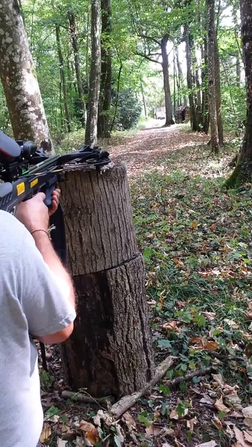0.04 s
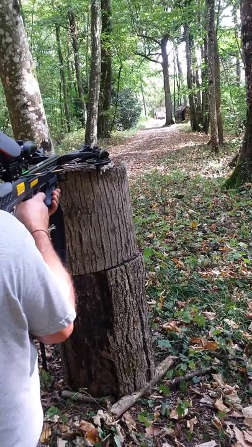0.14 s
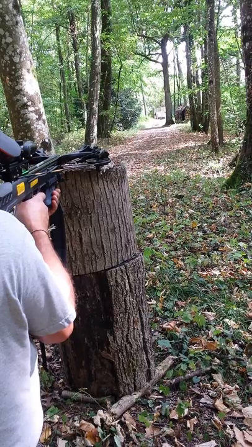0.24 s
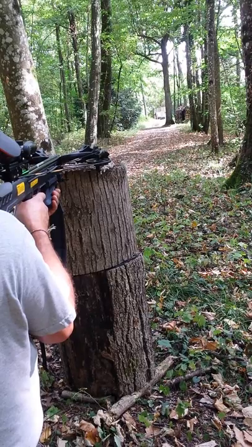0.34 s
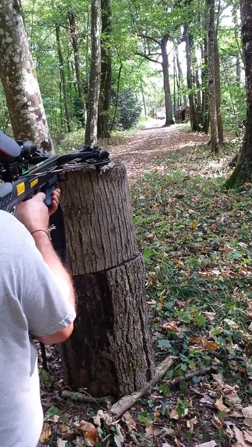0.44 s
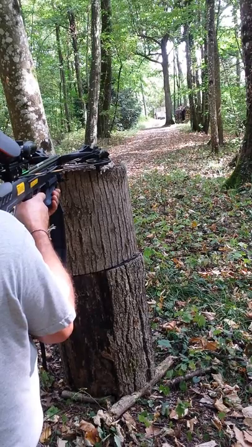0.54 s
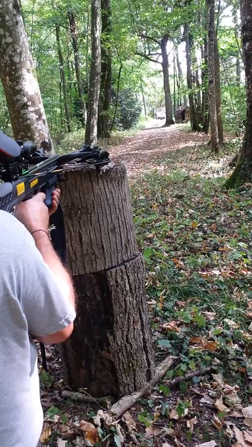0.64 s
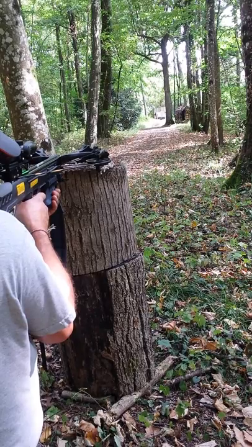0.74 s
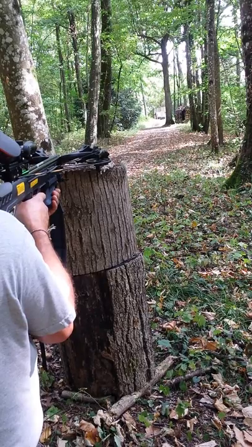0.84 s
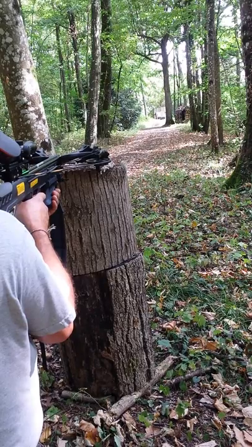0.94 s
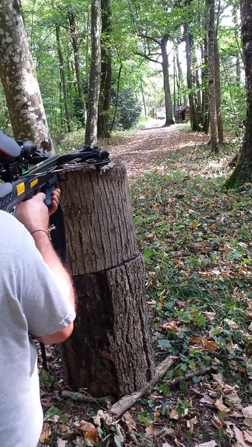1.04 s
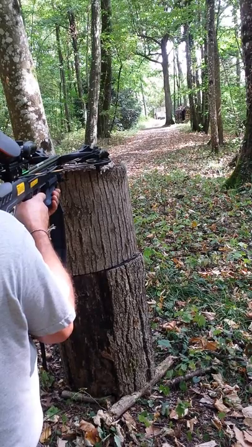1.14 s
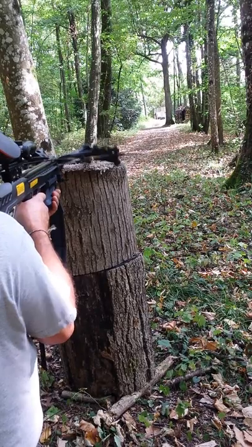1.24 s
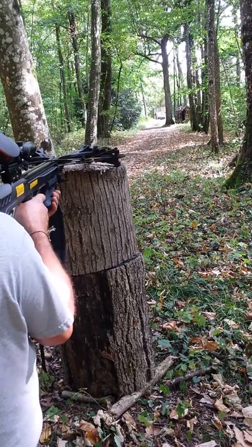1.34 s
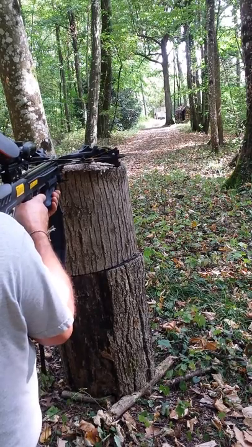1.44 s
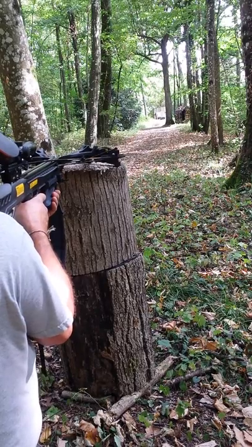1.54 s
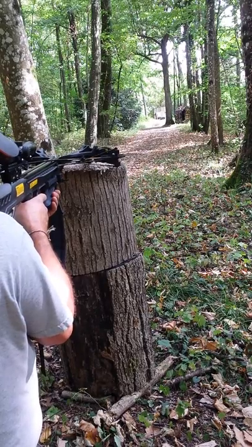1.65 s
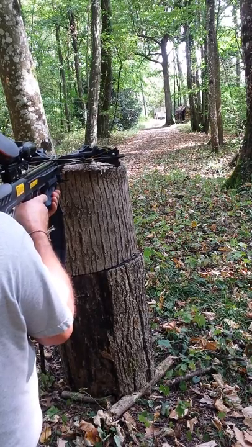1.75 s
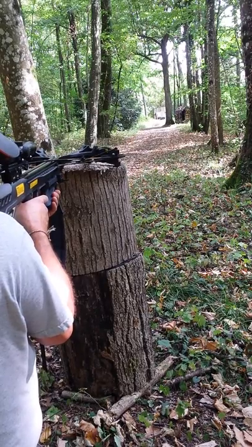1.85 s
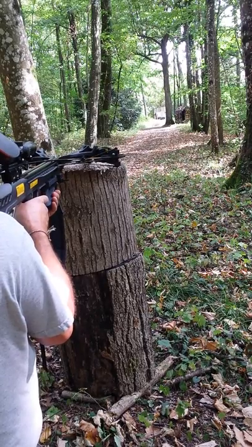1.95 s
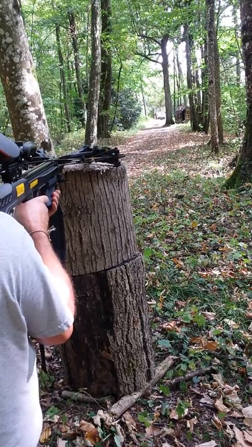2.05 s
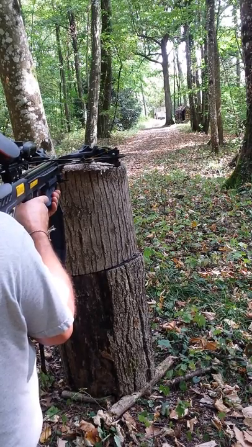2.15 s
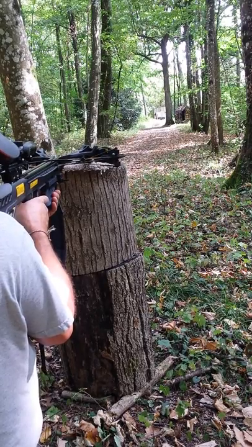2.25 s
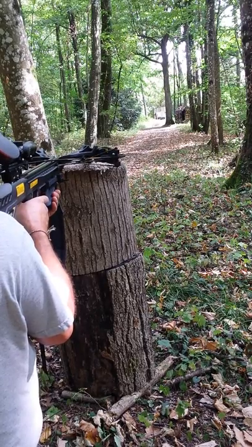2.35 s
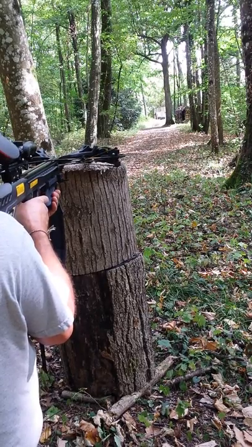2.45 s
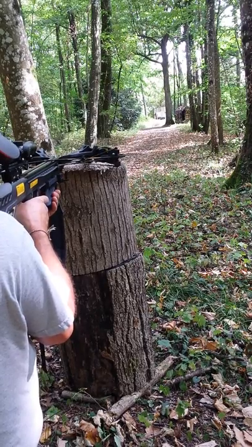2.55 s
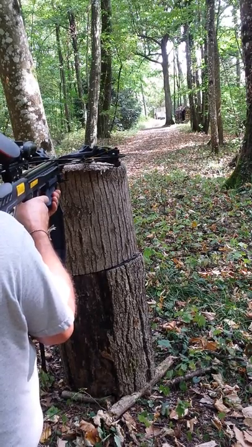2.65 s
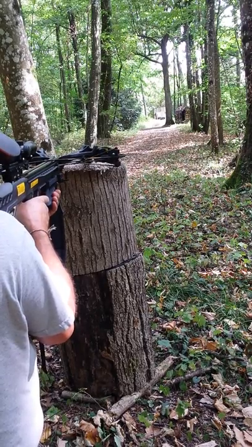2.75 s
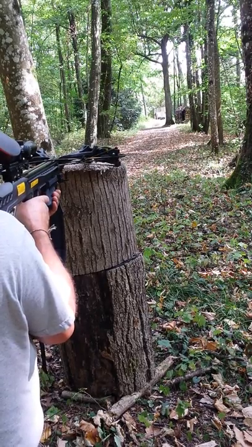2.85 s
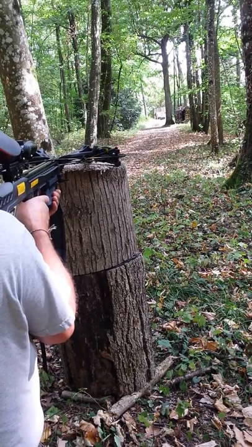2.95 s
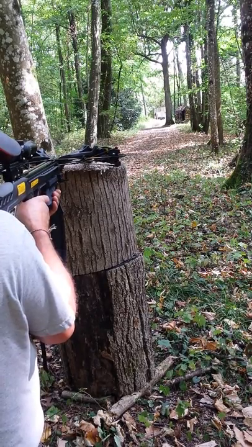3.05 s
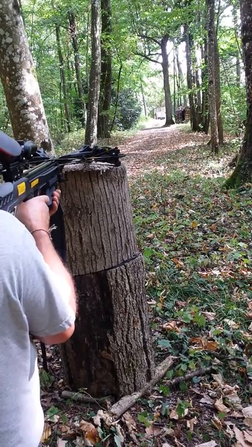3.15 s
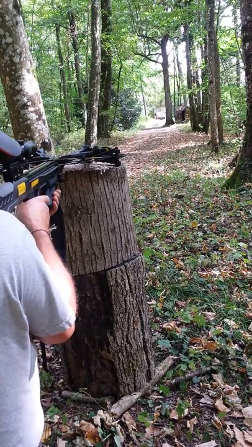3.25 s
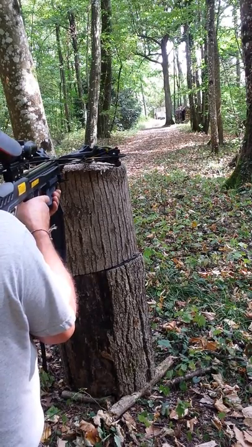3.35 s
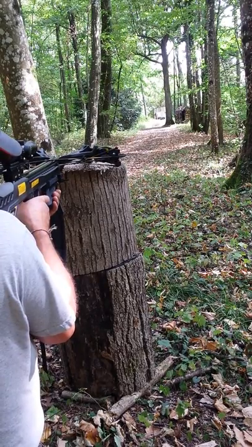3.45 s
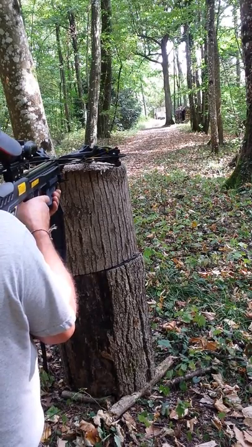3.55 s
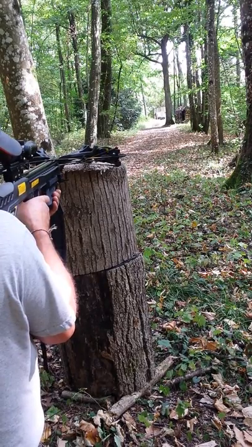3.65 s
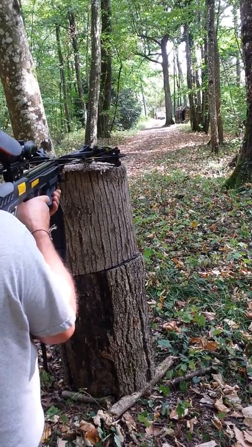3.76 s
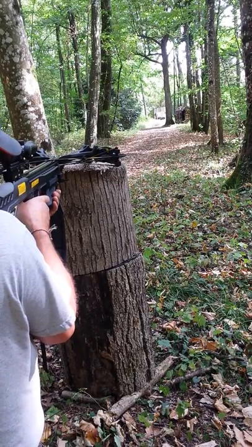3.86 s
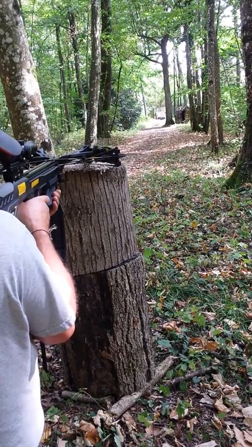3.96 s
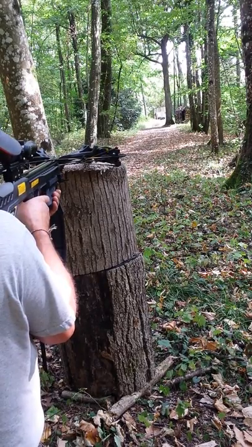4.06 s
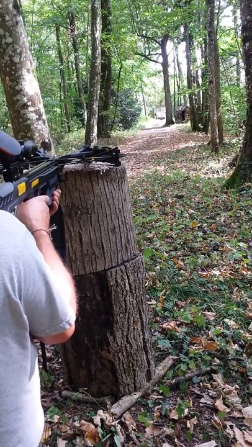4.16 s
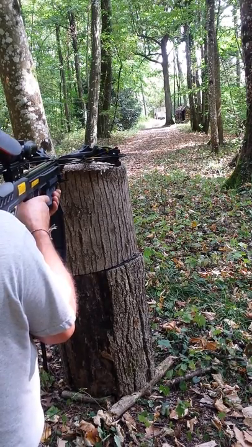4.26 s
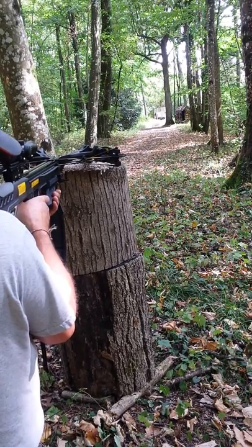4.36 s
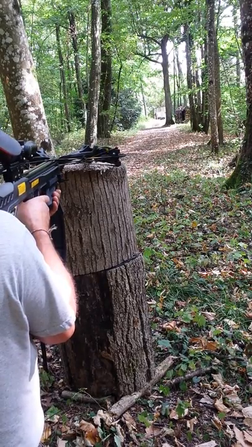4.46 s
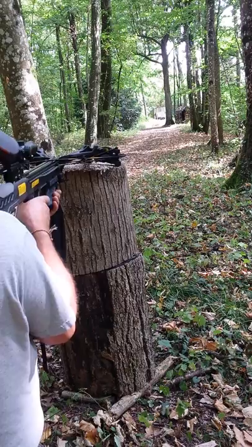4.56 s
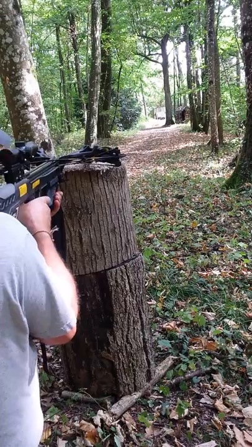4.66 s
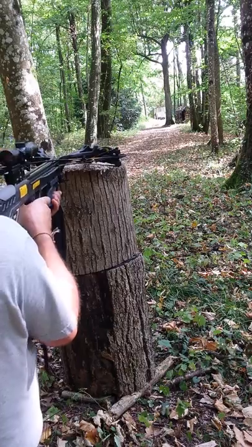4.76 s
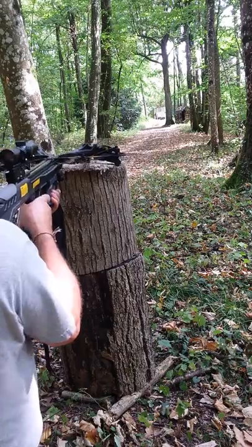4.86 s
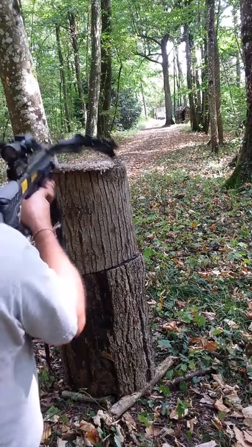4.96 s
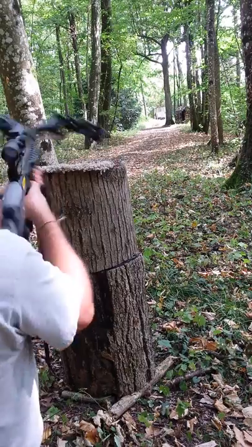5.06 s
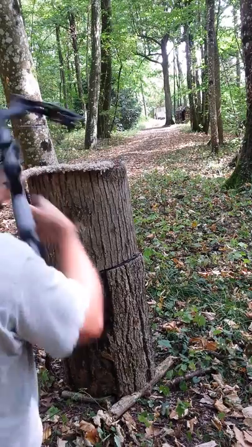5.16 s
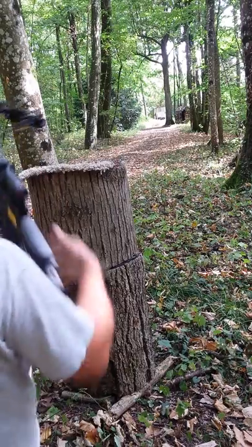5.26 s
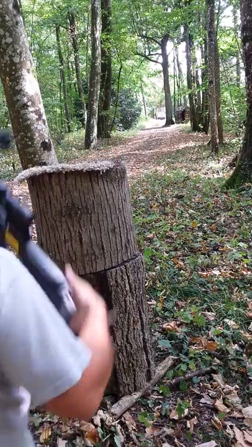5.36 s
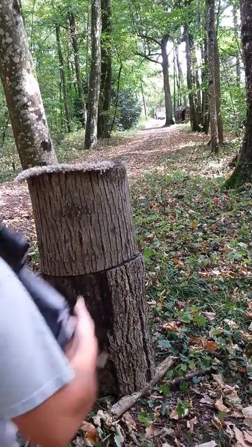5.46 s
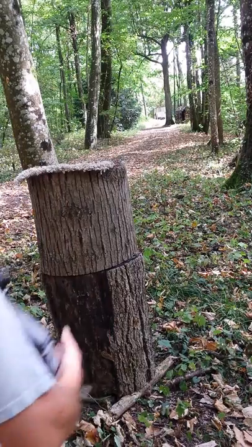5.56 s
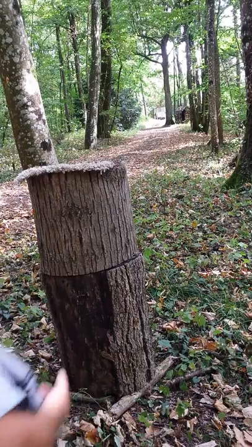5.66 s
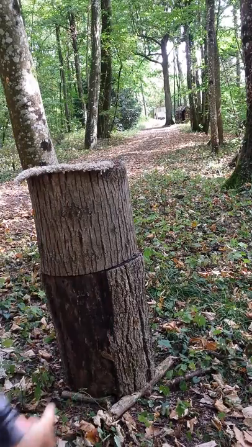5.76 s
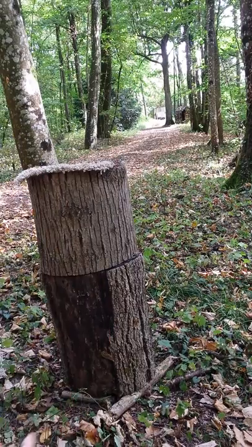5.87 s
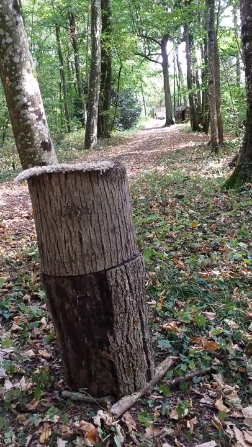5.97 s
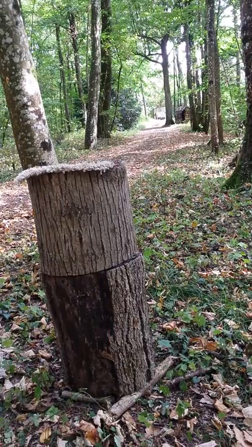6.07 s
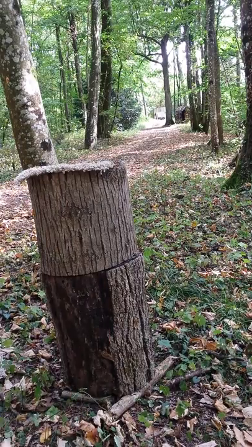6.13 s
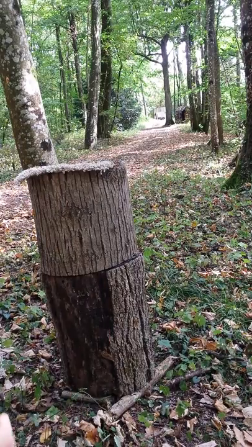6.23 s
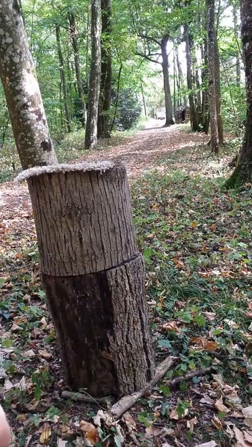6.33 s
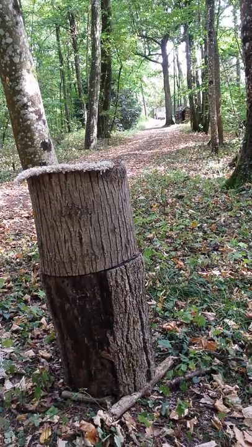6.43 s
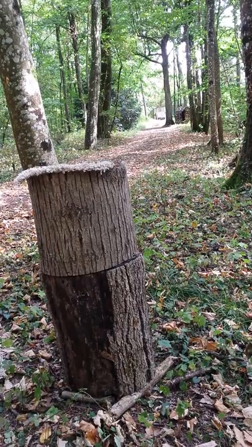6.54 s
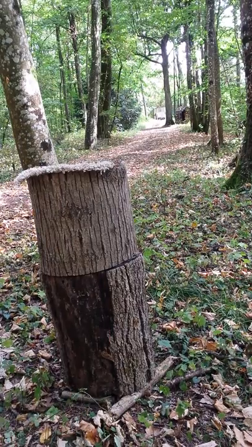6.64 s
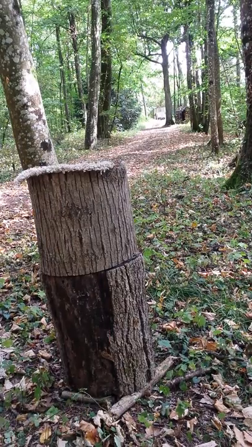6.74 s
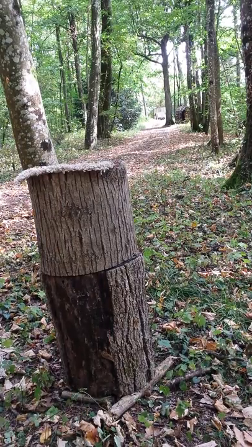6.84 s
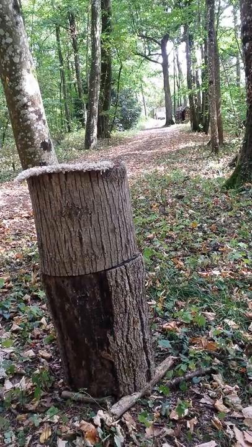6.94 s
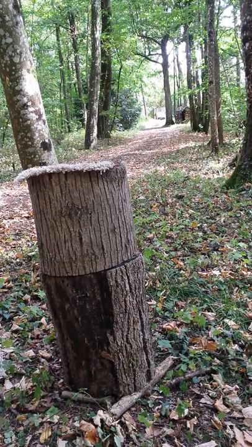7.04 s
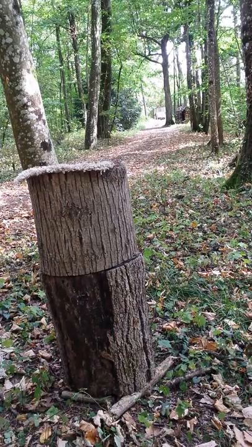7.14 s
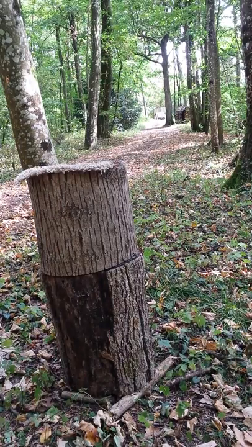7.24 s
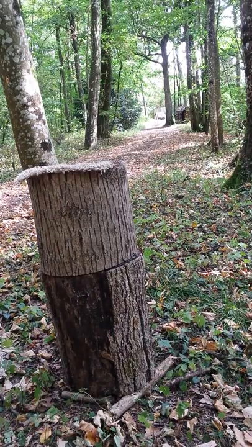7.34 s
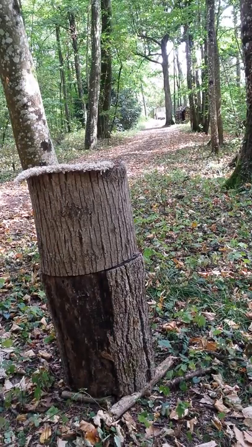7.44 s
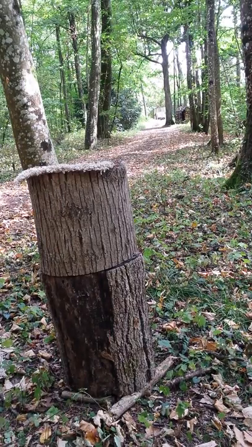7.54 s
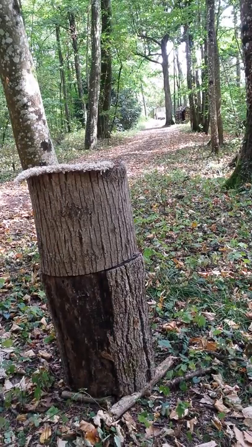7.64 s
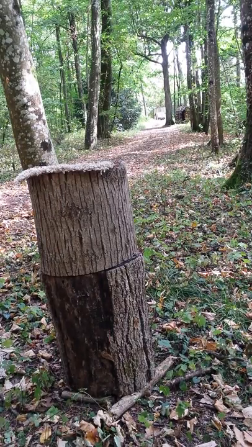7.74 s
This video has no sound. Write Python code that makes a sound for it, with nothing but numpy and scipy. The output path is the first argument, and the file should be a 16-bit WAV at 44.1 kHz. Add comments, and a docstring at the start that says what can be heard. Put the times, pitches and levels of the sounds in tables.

```python
"""Crossbow shot in a quiet wood

A crossbow is fired from a tree stump: contacts are noise bursts, its parts are ringing modes, trunks are echoes.
The bolt knocks into a far target, with a dull wash of echoes; a leaf or something dropping ticks in the litter.
Small birds call in gliding and held sine notes. The shooter lifts the bow away and steps through dry leaves:
bumps, brushed sleeves, leaf crackle, stalks snapping underfoot.
Two small microphone ports colour it all, and a loud peak ducks the recorder's gain for about a second."""
import sys
import numpy as np
from scipy import signal
from scipy.fft import rfft, irfft, next_fast_len
from scipy.io import wavfile
from scipy.ndimage import uniform_filter1d, minimum_filter1d

SR = 44100
rng = np.random.default_rng(int(sys.argv[2]) if len(sys.argv) > 2 else 0)


def unload_audio(sound):
    """Save the sound as a 16-bit wav file, at the path given as the first command line argument."""
    columns = np.transpose(np.atleast_2d(sound))
    # keep every value between -1 and 1, then stretch to whole-number steps
    steps = np.round(np.clip(columns, -1, 1) * 32767)
    wavfile.write(sys.argv[1], SR, steps.astype(np.int16))


N = 343980
SIZE = next_fast_len(N + SR)  # padded length for filtering
T = np.arange(N) / SR
HZ = np.maximum(np.arange(SIZE // 2 + 1) * SR / SIZE, 1)
PORT_SPACING_M, SOUND_SPEED_M_S = 0.094, 343

# In every table, levels are relative and stand before any colouring, mixing gain or placing.
# decay of the wood's echoes: hz, t60_s
WOOD_T60 = [(100, 0.83), (700, 0.73), (1500, 1), (3500, 0.61), (7000, 0.66), (14000, 0.3775)]
# a foot presses or drags in the leaf litter: peak_s, crackle_db, scuff_db, swell_s, t60_s, crunch_hz
STEPS = [(5.91, -59, -59.5, 0.0703, 3.8, 5884), (6.19, -71, -61.5, 0.027, 1.3, 5840),
         (6.741, -51, -55, 0.027, 0.18, 5314), (6.795, -50.5, -56.5, 0.025, 0.363, 5473),
         (6.921, -45.5, -53.5, 0.0297, 0.71, 12370), (7.152, -46.5, -51.5, 0.087, 2.1, 6172),
         (7.194, -39.5, -52.5, 0.018, 0.42, 9400), (7.295, -45, -45.5, 0.02003, 0.14, 5477),
         (7.47, -53, -53.5, 0.1531, 1.5, 9500), (7.665, -51, -54, 0.0193, 0.67, 5550),
         (7.712, -38.5, -51.5, 0.00648, 0.862, 5110), (7.78, -38, -51, 0.027, .6, 5380)]
# colour of soles and clothes scuffing: hz, level_db
SCUFF_COLOUR = [(40, 0.5), (120, 1.5), (400, 0), (900, -2), (1600, -8.5), (3000, -11.5), (8000, -25)]


def from_db(db):
    """Decibels to gain."""
    return 10 ** (np.asarray(db) / 20)


def at_hz(points, hz):
    """Read a table on a log-frequency axis."""
    f, value = np.transpose(points)
    return np.interp(np.log(hz), np.log(f), value)


def decay(age, t60):
    """Exponential fall of 60 dB in t60 seconds."""
    return np.exp(-np.log(1000) * age / t60)


def filtered(x, response):
    """Apply a frequency response."""
    return irfft(rfft(x, SIZE) * response, SIZE)[..., :N]


def coloured(x, points):
    """Minimum-phase colouring, so nothing sounds before its cause."""
    cepstrum = irfft(np.log(from_db(at_hz(points, HZ))), SIZE)
    # fold the cepstrum onto positive times
    cepstrum[1:SIZE // 2] *= 2
    cepstrum[SIZE // 2 + 1:] = 0
    return filtered(x, np.exp(rfft(cepstrum)))


def resonant(x, hz, q):
    """Keep what lies around one pitch."""
    b, a = signal.iirpeak(hz, max(q, 1), fs=SR)
    return signal.lfilter(b, a, x + 1e-18)


def drift(rate_hz):
    """Random wander with a spread of one, smoothed above rate_hz."""
    slow = filtered(rng.standard_normal(SIZE), 1 / (1 + (HZ / rate_hz) ** 2))
    return slow / slow.std()


def diffuse():
    """White noise from all sides: the ports agree only on long waves."""
    a, b = rng.standard_normal((2, N))
    alike = np.clip(.95 * np.sinc(2 * HZ * PORT_SPACING_M / SOUND_SPEED_M_S), -1, 1)
    right = filtered(a, alike) + filtered(b, np.sqrt(1 - alike ** 2))
    return np.array([a, right])


def placed(x, lag_ms, lean_db):
    """The left port hears later by lag_ms; short waves lean left by lean_db, long waves reach both alike."""
    shade_db = lean_db / 2 * HZ ** 2 / (HZ ** 2 + 1500 ** 2)
    late = np.exp(-2j * np.pi * HZ * lag_ms / 1000)
    return filtered(x, np.array([from_db(shade_db) * late, from_db(-shade_db)]))


def bursts(rows):
    """Envelope of sudden contacts that die away; their powers add."""
    power = np.zeros(N)
    for s, level_db, t60 in rows:
        at = round(s * SR)
        age = T[:min(N - at, SR // 4)]
        power[at:at + len(age)] += (from_db(level_db) * decay(age, t60)) ** 2
    return np.sqrt(power)


def struck(blows, modes):
    """Each blow sets the body's modes ringing."""
    clicks, age = np.zeros(N), T[:SR // 2]
    for s, level_db in blows:
        clicks[round(s * SR)] += from_db(level_db)
    ring = sum(from_db(db) * np.sin(2 * np.pi * hz * age) * decay(age, t60) for hz, db, t60 in modes)
    return signal.fftconvolve(clicks, ring)[:N]


def click(rows):
    """One unit pulse at the moment of the loudest of these contacts."""
    loudest = max(rows, key=lambda row: row[1])
    return signal.unit_impulse(N, round(loudest[0] * SR))


def breaks(per_s, spread_db):
    """Clicks at random moments: many small, a few large."""
    born = np.flatnonzero(rng.random(N) < per_s / SR)
    size_db = spread_db * np.minimum(rng.exponential(1, len(born)), 3.5)
    clicks = np.zeros(N)
    clicks[born] = from_db(size_db) * rng.choice([-1, 1], len(born))
    return clicks / clicks.std()


def pressure(peak_s, swell_s, t60):
    """Pressure swells to a peak of one, then eases off."""
    age = T - peak_s
    fall = np.where(age < 0, (age / swell_s) ** 2 / 2, np.log(1000) * age / t60)
    return np.exp(-np.minimum(fall, 20))


def wood(x, t60s, build_s, trunk_width_s=0.018):
    """Echoes from countless trunks, as decaying noise, build up and then die, band by band."""
    # groups of trunks that answer more strongly, or less: delay_s, gain_db
    trunks = [(.043, 2), (0.093, 4), (.138, 1.5), (.19, -0.5), (.264, -1.5)]
    age, centres = T[:3 * SR // 2], np.geomspace(100, 14000, 8)
    echoes = rfft(diffuse()[:, :len(age)])
    hz = np.maximum(np.linspace(0, SR / 2, echoes.shape[1]), 1)
    response = 0
    for centre, share in zip(centres, np.eye(len(centres))):
        band = irfft(echoes * np.interp(np.log(hz), np.log(centres), share), len(age))
        response = response + band * decay(age, at_hz(t60s, centre))
    answers_db = sum(db * np.exp(-((age - s) / trunk_width_s) ** 2) for s, db in trunks)
    response = response * (1 - np.exp(-age / build_s)) * from_db(answers_db)
    response /= np.sqrt(np.sum(response ** 2) / 2)  # unit energy per port, on average
    return signal.fftconvolve(x[None], response, axes=1)[:, :N]


def air():
    """Far wind in the crowns: coloured noise from all sides, its level barely moving."""
    # the wood's distant murmur: hz, level_db
    murmur_colour = [(15, -57), (35, -43.5), (85, -41.5), (160, -43.5), (260, -46.5), (450, -49.5),
                     (1000, -52), (2000, -58), (3400, -60.5), (5000, -65), (7200, -68), (15000, -79)]
    # lean to the left, added there and taken from the right: hz, lean_db
    lean = [(200, 0.6019), (1000, 0.647), (2200, 2.5), (5000, 0.8353), (9000, -1)]
    murmur = coloured(diffuse(), murmur_colour) * from_db(.5 * drift(4.4))
    lean_db = at_hz(lean, HZ)
    return placed(filtered(murmur, from_db([lean_db, -lean_db])), lag_ms=0.04746, lean_db=-0.5)


def whistles(calls, length_s, glide_hz, waver):
    """One gliding sine note, sung at each call."""
    out, n = np.zeros(N), round(length_s * SR)
    for s, level_db, hz in calls:
        at = max(round(s * SR), 0)
        pitch = np.linspace(hz, hz + glide_hz, n) * waver[at:at + n]
        tone = np.sin(2 * np.pi * np.cumsum(pitch) / SR)
        out[at:at + n] += from_db(level_db) * np.sqrt(np.hanning(n)) * tone
    return out


def birds():
    """Thin wavering whistles high in the canopy and one low far coo, blurred by their echoes."""
    # one bird repeats a high, falling "tsee": start_s, level_db, start_pitch_hz
    tsees = [(.11, -61, 7830), (.27, -61.5, 8230), (.413, -63, 7850), (.628, -61.5, 8130),
             (1.765, -60, 7933), (1.93, -61, 7900), (3.761, -60, 7978), (4.23, -65, 7980),
             (4.377, -60, 8080), (4.915, -57.5, 7554)]
    # another calls a rising "hweet": start_s, level_db, start_pitch_hz
    hweets = [(4.958, -58, 3590), (5.34, -62, 3484)]
    # quick downward flicks: start_s, level_db, start_pitch_hz
    flicks = [(1.035, -57, 5230), (5.308, -60.5, 7400)]
    # whistles without a glide and a low far coo: start_s, level_db, length_s, pitch_hz
    held_notes = [(.018, -73, 0.175, 5270), (.13, -60, 0.2, 486), (.37, -68, 0.26, 5430),
                  (4.843, -62, 0.0553, 7400)]
    waver = 1 + .012 * drift(127.05)  # as a share of the pitch
    steady = 1 + .005 * drift(120)  # the held notes waver less
    song = (whistles(tsees, length_s=.056, glide_hz=-640, waver=waver)
            + whistles(hweets, length_s=.075, glide_hz=810, waver=waver)
            + whistles(flicks, length_s=0.015, glide_hz=-1500, waver=waver)
            + sum(whistles([(s, db, hz)], length_s, 0, steady) for s, db, length_s, hz in held_notes))
    direct = from_db(-1.0) * placed(song, lag_ms=0.068, lean_db=6.5)
    return direct + from_db(-7) * wood(song, WOOD_T60, build_s=0.00912)


def sleeves():
    """Cloth brushes with a thin swish over a dull scuff, both noise shaped by the pressure."""
    # sleeves brush as the bow is lifted: peak_s, swish_db, scuff_db, swell_s, t60_s
    brushes = [(5.05, -62.5, -64.5, 0.1, 3.5), (5.24, -61, -61, 0.024, .3)]
    swish = sum(from_db(db) * pressure(s, swell_s, t60) for s, db, _, swell_s, t60 in brushes)
    scuff = sum(from_db(db) * pressure(s, swell_s, t60) for s, _, db, swell_s, t60 in brushes)
    cloth = diffuse() * swish + from_db(14) * coloured(diffuse() * scuff, SCUFF_COLOUR)
    return placed(cloth, lag_ms=0.12, lean_db=3.5)


def handling(softness_s=0.0083):
    """Soft bumps of the lifted bow, then of feet on the ground: dull noise with rounded onsets."""
    # start_s, level_db (before softening), t60_s
    bumps = [(5.105, -55.5, 0.074), (5.213, -35.5, 0.04778), (5.234, -35, 0.0618), (5.404, -45, 0.065),
             (6.738, -52, 0.037), (7.242, -26, 0.036), (7.288, -40, 0.059), (7.767, -28.5, .05)]
    # hz, level_db
    bump_colour = [(60, -9), (190, 8), (450, 3.5), (1000, 3), (1800, -12.5), (4000, -28), (8000, -26),
                   (15000, -27)]
    contact = uniform_filter1d(bursts(bumps), size=max(round(softness_s * SR), 1))
    return coloured(diffuse() * contact, bump_colour)


def leaf_grains(cracks_per_s, size_spread_db, cycles, count=14):
    """Tiny ribs break at random; each rings a few cycles at one of many pitches."""
    pitches = np.geomspace(1800, 15000, count)
    out = sum(resonant(breaks(cracks_per_s / count, size_spread_db), hz, cycles) for hz in pitches)
    return out / out.std()


def snaps(rows, sharpness=5.6, break_db=8):
    """Each tick or snap is a sharp click with a short burst of noise around its own pitch."""
    out = np.zeros(N)
    for s, level_db, t60, hz in rows:
        at = round(s * SR)
        age = T[:min(N - at, SR // 8)]
        splinters = rng.standard_normal(len(age)) * decay(age, t60)
        crack = from_db(break_db) * resonant(signal.unit_impulse(len(age)), hz, 1)
        out[at:at + len(age)] += from_db(level_db) * (resonant(splinters, hz, sharpness) + crack)
    return out


def stray_snaps(crackle, per_s=30, hardest_db=-39, follows=0.96, t60_s=0.0054):
    """Small stalks give way at random moments and pitches, louder the harder the foot presses."""
    first_s, last_s = STEPS[0][0], T[-1]
    rows = []
    for when, pitch in rng.random((round(per_s * (last_s - first_s)), 2)):
        s = first_s + when * (last_s - first_s)
        pressing_db = 20 * np.log10(crackle[int(s * SR)] / crackle.max())
        # follows: share of the pressure's swing in dB
        rows.append((s, hardest_db + follows * pressing_db, t60_s, 5000 + 8000 * pitch))
    return rows


def footsteps_and_litter(clump_db=1.6, hiss_db=1.5, crunch_db=5.5):
    """One early tick in the litter; later, feet break many tiny leaf ribs over a dull scuff and snap stalks."""
    # one tick of a leaf or something dropping in the litter after the shot,
    # then dry stalks that snap underfoot: start_s, level_db, t60_s, pitch_hz
    tick_and_snaps = [(1.4145, -31, .036, 4900), (5.938, -36.5, 0.056, 6100), (6.003, -34, 0.00807, 11000),
                      (6.017, -38, .007, 8000), (6.0497, -28, 0.0065, 7667), (6.739, -34, .025, 5130),
                      (6.799, -30.5, .012, 10030), (6.995, -36, .011, 9000), (7.081, -23, 0.00564, 7100),
                      (7.0825, -18.5, .008, 9100), (7.0937, -19, 0.0069, 13500), (7.2045, -26, .011, 7550),
                      (7.403, -31, 0.0073, 8800), (7.413, -22, 0.01454, 10160)]
    # dry leaves cracking: hz, level_db
    leaf_colour = [(300, -24), (1200, 0), (2200, -5), (3600, 2.5), (5100, 2), (7200, 0), (9000, 0),
                   (12000, 7.5), (15500, 7)]
    grains = leaf_grains(cracks_per_s=2840, size_spread_db=6.5, cycles=3.6)
    clumps = from_db(clump_db * drift(61.3) - 3.5)
    litter = (grains + from_db(hiss_db) * diffuse()) * clumps
    stiff_leaves = breaks(per_s=2400, spread_db=4.0)
    crackle, scuff, crunch = 0, 0, 0
    for s, crackle_db, scuff_db, swell_s, t60, hz in STEPS:
        weight = pressure(s, swell_s, t60)
        crackle = np.hypot(crackle, from_db(crackle_db) * weight)
        scuff = np.hypot(scuff, from_db(scuff_db) * weight)
        # the stiffest leaves under the sole ring above the rest
        crunch = crunch + from_db(crackle_db + crunch_db) * resonant(stiff_leaves * weight, hz, q=5.2)
    sharp_sounds = snaps(tick_and_snaps + stray_snaps(crackle))
    dry_litter = coloured(litter * crackle, leaf_colour) + crunch + sharp_sounds
    soles = from_db(14.5) * coloured(diffuse() * scuff, SCUFF_COLOUR)
    return placed(dry_litter + soles, lag_ms=-0.14, lean_db=-1.0)


def bolt():
    """A far knock: a thin direct tick, a small ringing thud and a long dull wash."""
    # the bolt strikes and shudders: start_s, level_db, t60_s
    hits = [(2.0385, -24, 0.0034), (2.0395, -36.5, 0.022), (2.0490, -33.5, 0.013), (2.0538, -42, 0.057)]
    # modes of the target's face: hz, level_db, t60_s
    target_modes = [(168, 3, 0.05124), (248, 9, 0.026), (474, -13.5, .03), (805, -5, 0.023),
                    (2540, -1.5, .012), (4500, -9.5, .012)]
    # colour of the knock heard directly: hz, level_db
    tick_colour = [(200, -7), (1100, 1), (1700, -7), (2600, 7), (3300, -2), (4400, 1.5), (5700, -7),
                   (7800, -2), (11000, -8), (15000, -10)]
    # colour of its wash through the trees: hz, level_db
    wash_colour = [(100, -15), (300, -5.5), (480, -8), (700, -2.5), (1100, -7), (2000, -10), (4000, -16.5),
                   (7500, -21.5), (11000, -25), (15000, -29)]
    # decay of that wash: hz, t60_s
    wash_t60 = [(100, 1.8), (800, 1.964), (3000, 1.0843), (10000, 0.9985)]
    tick = coloured(rng.standard_normal(N) * bursts(hits), tick_colour)
    thud = struck([(2.0388, -59), (2.0435, -46.5)], target_modes)  # blows: start_s, level_db
    wash = wood(coloured(click(hits), wash_colour), wash_t60, build_s=0.038)
    return placed(tick + thud, lag_ms=0.11, lean_db=-5) + from_db(1.5) * wash


def rattle(count=3, start_s=1.1738, gap_s=.0084, level_db=-22.5, rise_db=2, t60_s=0.027):
    """Evenly spaced bounces of the fittings, each a little stronger than the last."""
    return [(start_s + k * gap_s, level_db + k * rise_db, t60_s) for k in range(count)]


def crossbow(radiation_hz=150):
    """Hard parts crack and rattle, limbs and stock ring, and the wood answers the hardest crack."""
    # the latch lets go, the string runs, cracks home and rebounds: start_s, level_db, t60_s
    cracks = [(1.1389, -16, 0.1265), (1.1422, -13, 0.0127), (1.1484, -15, 0.06604), (1.1523, -6.5, .011),
              (1.1555, -12, .04), (1.1648, -17, 0.02216)]
    # string and limbs slam into their stops and rebound: start_s, level_db
    slams = [(1.1482, -14), (1.1511, -9.5), (1.1540, -17.5), (1.1555, -24), (1.1626, -12.5),
             (1.1684, -18.5), (1.1714, -19.5)]
    # modes of limbs, stock and metal fittings: hz, level_db, t60_s
    bow_modes = [(96, -24, 0.13), (203, -16, .094), (255, -11, 0.044), (317, -11.5, 0.065),
                 (497, -13.5, .06), (617, -6.5, .035), (710, -4.5, 0.022), (847.27, -3, .03),
                 (1052.6, -11, .025), (2420, -20, .05), (2951.4, -40, .4), (3600, -33, 0.45),
                 (4000, -43, .35), (4190, -35, .32), (4800, -24.5, 0.3), (6000, -32.5, 0.13),
                 (6700, -41.5, 0.15), (7087, -30, .2)]
    # colour of the crack heard directly: hz, level_db
    crack_colour = [(30, -24), (100, -21), (500, 2.5), (1200, 1.5), (1800, -4), (2400, 0), (4000, 0),
                    (5500, -4), (7200, -6), (10000, -3), (13000, 3), (16000, 0)]
    # colour of what the trunks send back: hz, level_db
    scatter_colour = [(30, -34), (100, -5), (300, -7), (600, 3.5), (1100, -.5), (1700, -5.5), (3200, 4.5),
                      (4500, 4), (7000, -1.5), (10000, 3), (15000, 11.5)]
    crack = coloured(diffuse() * bursts(cracks + rattle()), crack_colour)
    # a small body radiates little bass
    radiation = signal.butter(2, radiation_hz, "high", fs=SR, output="sos")
    body = signal.sosfilt(radiation, struck(slams, bow_modes))
    direct = placed(crack, lag_ms=0.33, lean_db=-9.0) + from_db(-0.4) * placed(body, lag_ms=0.27, lean_db=4)
    scatter = wood(coloured(click(cracks), scatter_colour), WOOD_T60, build_s=0.022)
    return direct + from_db(7.0) * placed(scatter, lag_ms=0.036, lean_db=4.5)


def scene():
    """Everything that reaches the microphones."""
    return air() + birds() + sleeves() + handling() + footsteps_and_litter() + bolt() + crossbow()


def gain_control(x, above_db=-16, depth_db=4.0, hold_s=0.91, release_db_per_s=20):
    """A loud peak pulls the gain down; it is held, then rises back steadily."""
    peak_db = 20 * np.log10(np.abs(x).max(axis=0) + 1e-9)
    over_db = np.clip(peak_db - above_db, 0, depth_db)
    half = int(hold_s * SR / 2)
    # the largest excess within the past hold_s
    held_db = -minimum_filter1d(-over_db, 2 * half + 1, origin=half, mode="constant")
    cut_db = np.maximum.accumulate(held_db + release_db_per_s * T) - release_db_per_s * T
    return x * from_db(-uniform_filter1d(cut_db, size=64))


def record(dry):
    """Each port is a small cavity resonator; then self-noise, gain control and the top cut."""
    # microphone ports, left then right: resonance_hz, sharpness_q (no unit)
    port_cavities = [(3950, 2.67), (7250, 3.77)]
    ports = np.array([1 / (1 - (HZ / hz) ** 2 + 1j * HZ / (hz * q)) for hz, q in port_cavities])
    self_noise = from_db(-66.5) * rng.standard_normal((2, N))
    heard = filtered(dry, ports) + self_noise
    top_cut = signal.ellip(12, .2, 90, 15600, fs=SR, output="sos")  # cutoff in Hz
    return signal.sosfilt(top_cut, gain_control(heard))


dry = scene()
out = record(dry)
unload_audio(out)
```